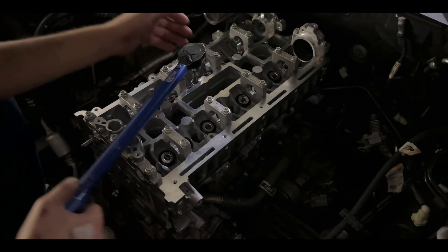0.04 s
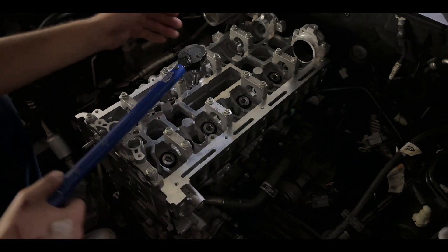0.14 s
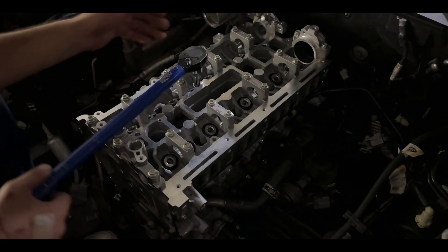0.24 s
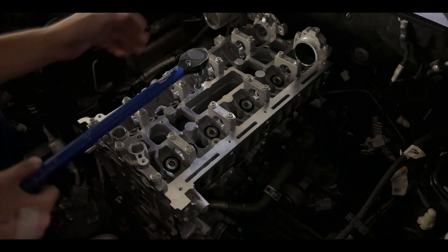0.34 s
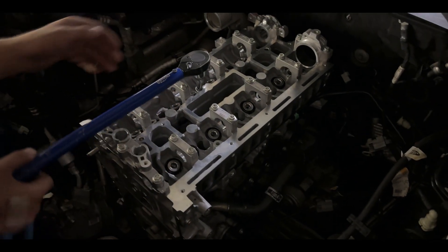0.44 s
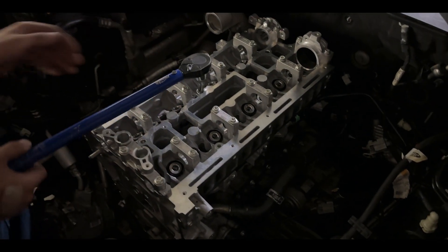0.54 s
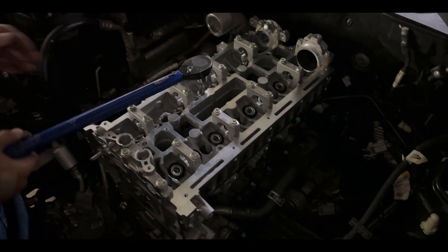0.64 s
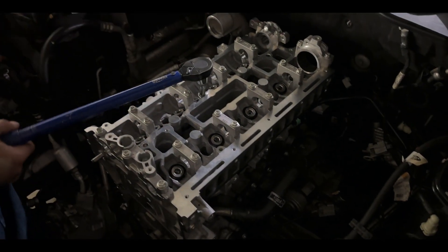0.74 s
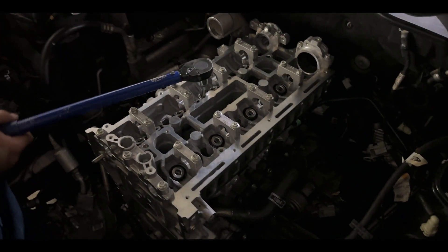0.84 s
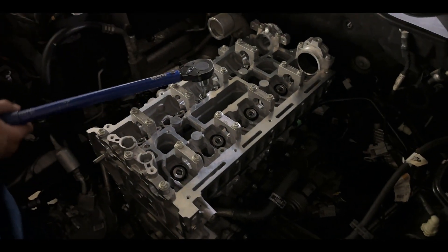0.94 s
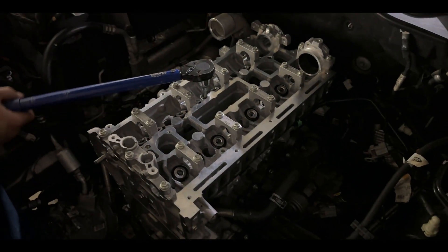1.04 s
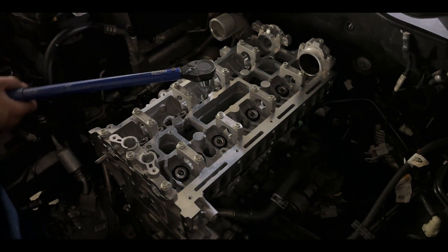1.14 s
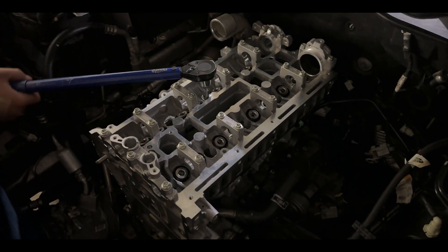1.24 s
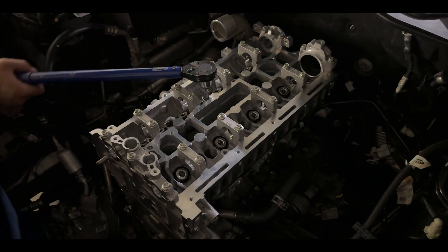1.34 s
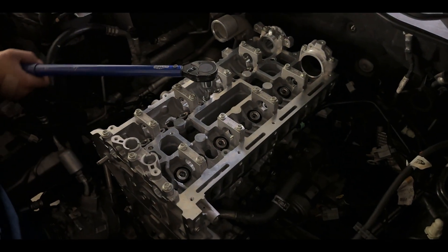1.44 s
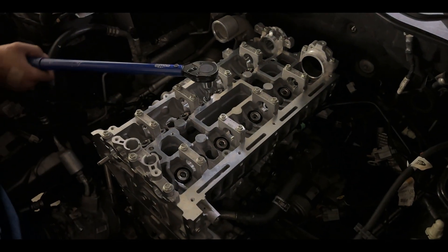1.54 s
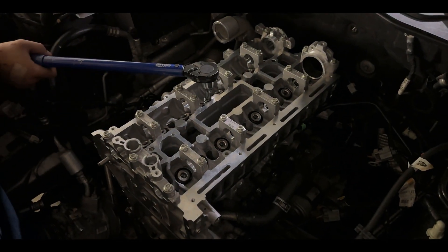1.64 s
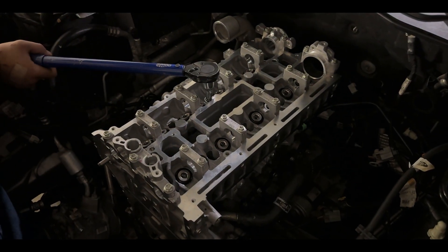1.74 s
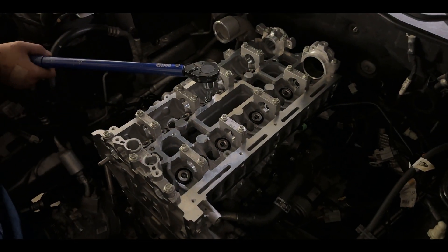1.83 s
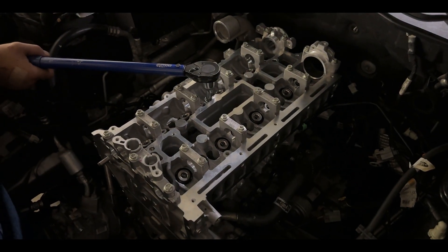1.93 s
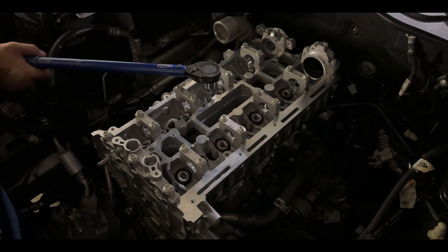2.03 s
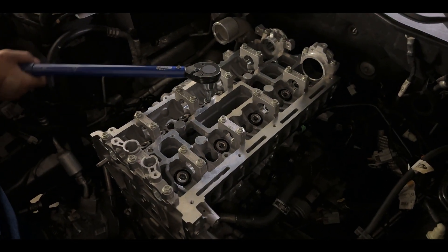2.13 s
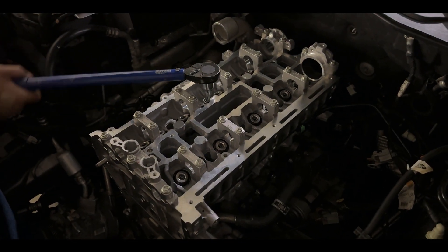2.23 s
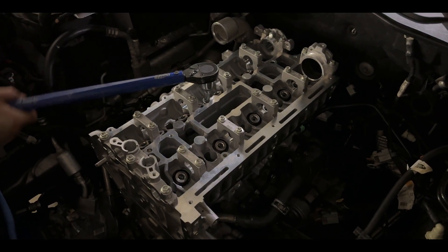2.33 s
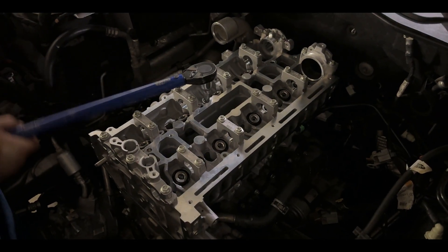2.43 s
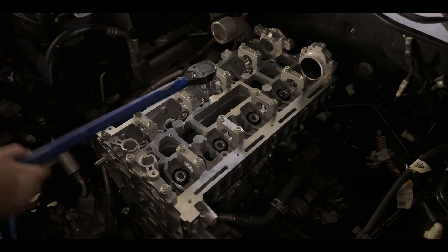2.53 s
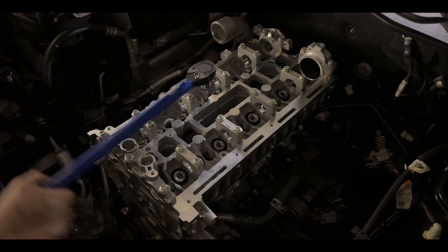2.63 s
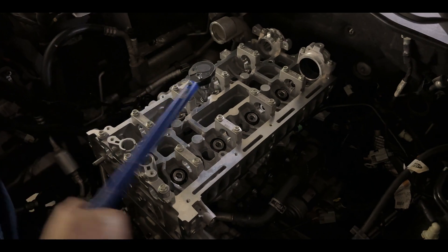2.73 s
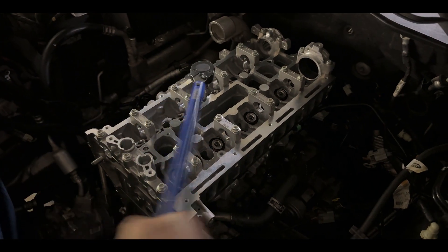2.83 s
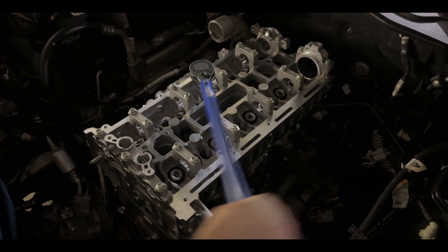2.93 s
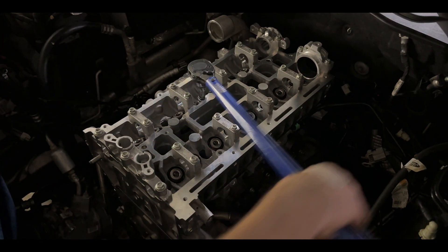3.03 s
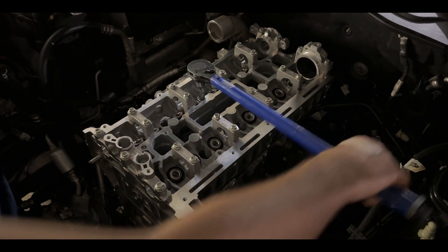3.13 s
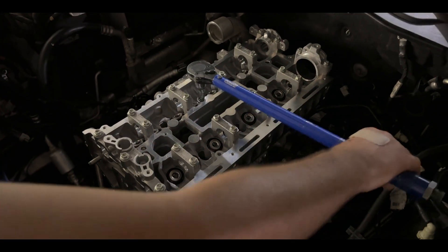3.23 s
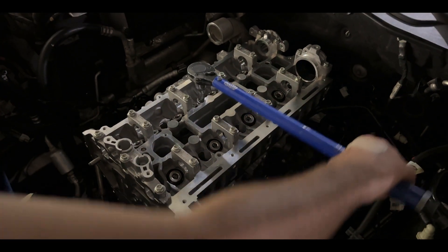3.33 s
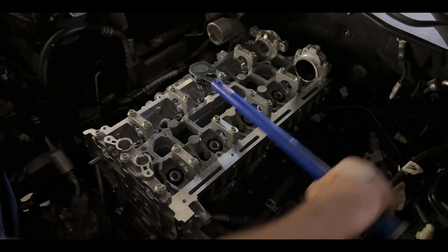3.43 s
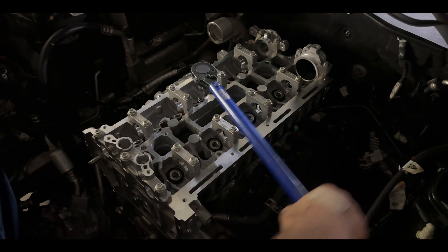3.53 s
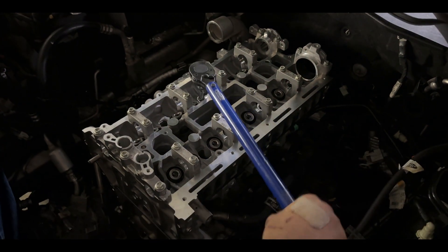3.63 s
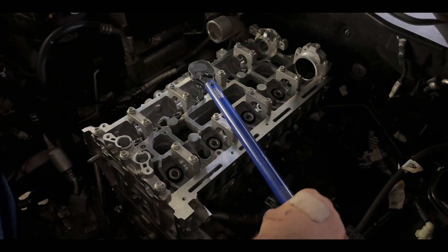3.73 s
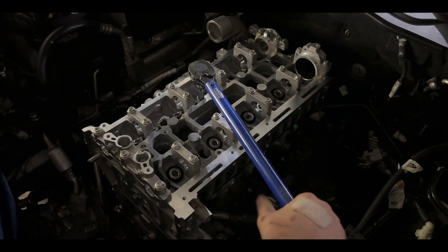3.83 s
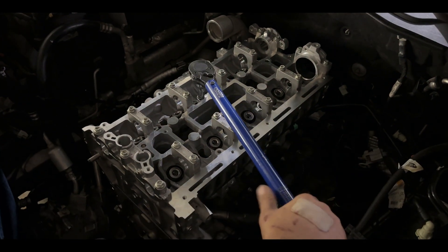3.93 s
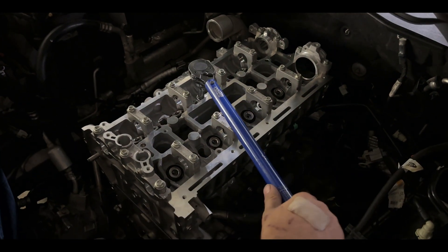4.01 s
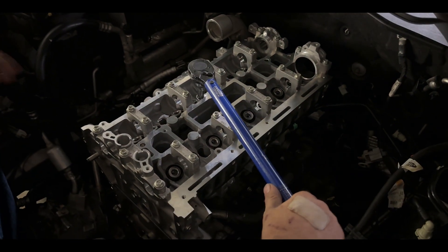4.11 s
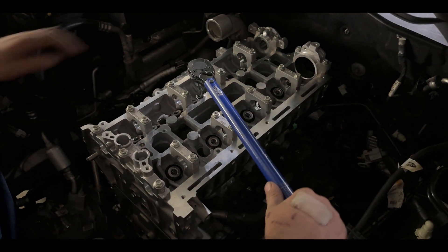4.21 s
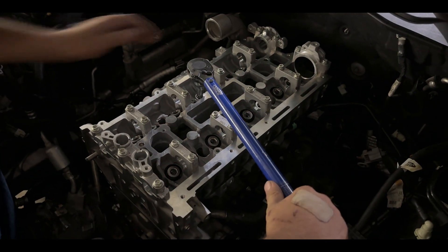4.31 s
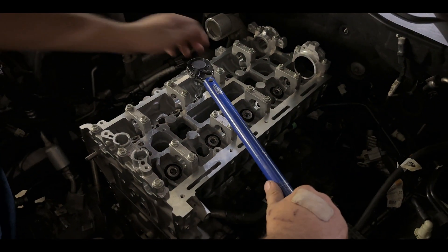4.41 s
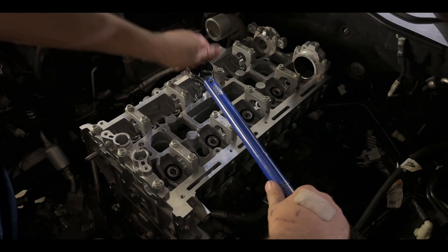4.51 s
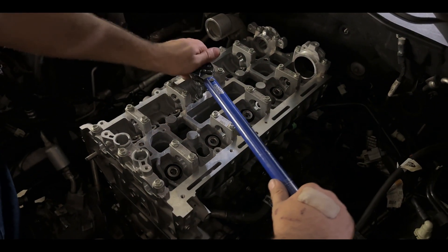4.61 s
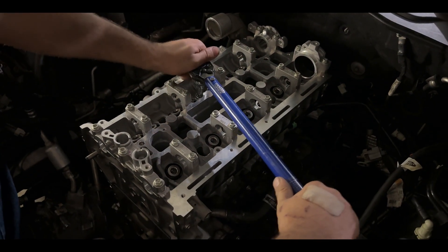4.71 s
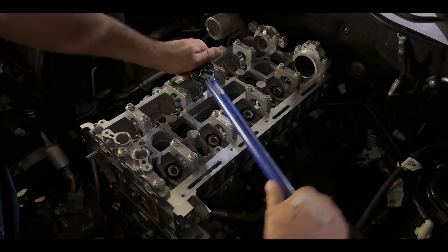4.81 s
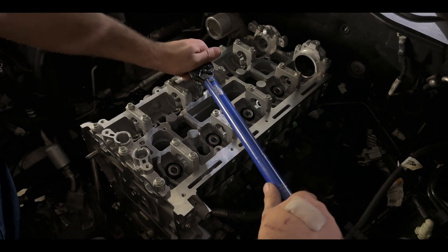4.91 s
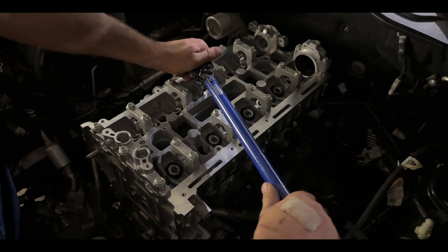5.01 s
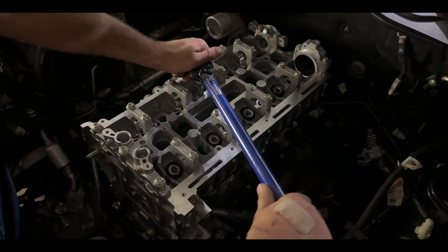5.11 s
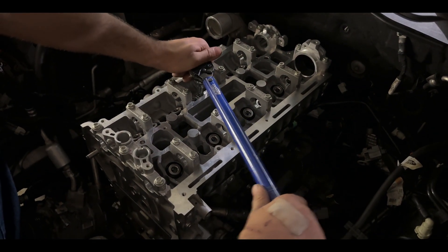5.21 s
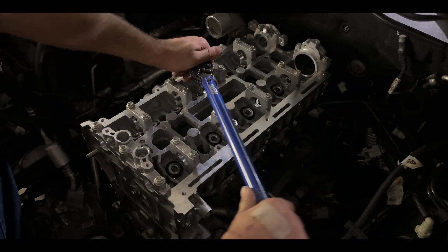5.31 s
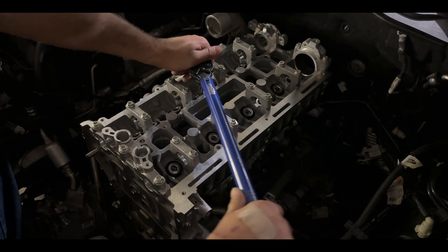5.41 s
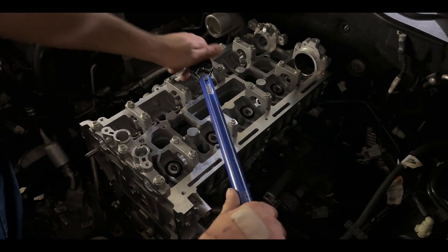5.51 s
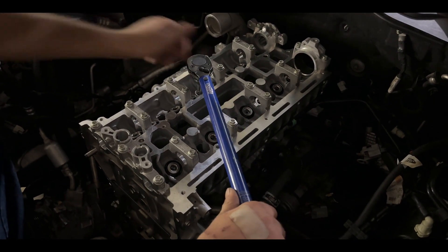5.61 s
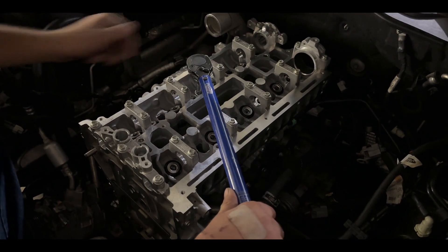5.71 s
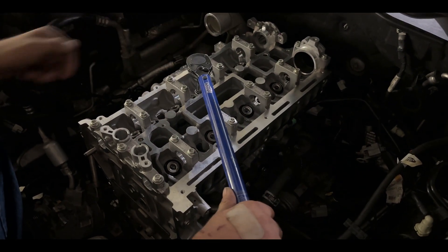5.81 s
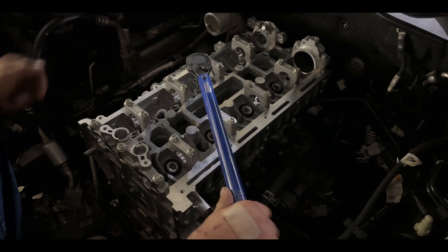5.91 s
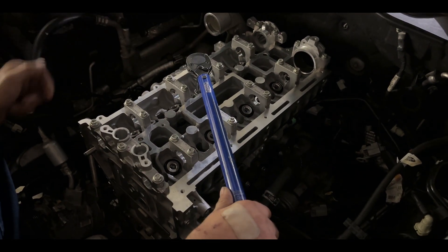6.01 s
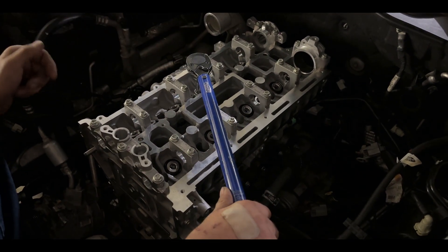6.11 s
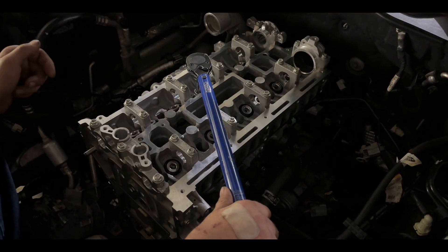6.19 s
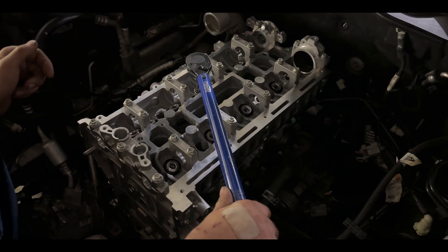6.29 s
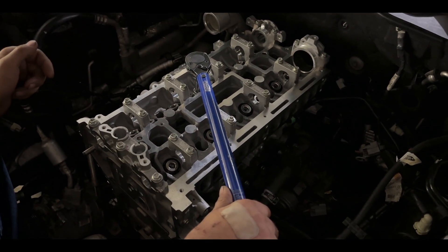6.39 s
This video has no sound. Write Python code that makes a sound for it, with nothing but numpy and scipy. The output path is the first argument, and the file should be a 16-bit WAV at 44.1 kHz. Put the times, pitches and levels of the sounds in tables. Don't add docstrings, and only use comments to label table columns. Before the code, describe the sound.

A torque wrench is eased over in a quiet workshop, its ratchet snaps eight bright metallic teeth, then one hard click as it releases.

```python
import sys
import numpy as np
from scipy import signal
from scipy.fft import rfft, irfft, next_fast_len
from scipy.io import wavfile
from scipy.ndimage import uniform_filter1d, map_coordinates

SR = 44100
rng = np.random.default_rng(int(sys.argv[2]) if len(sys.argv) > 2 else 0)


def wav_out(sig):
    wavfile.write(sys.argv[1], SR, np.round(np.clip(np.atleast_2d(sig).T, -1, 1) * 32767).astype(np.int16))


def decibels_to_gain(level_db):
    exponent = np.asarray(level_db, float) / 20
    return 10 ** exponent


N = 284471

# (time [s], peak [dB], casting share [dB], casting note [Hz], top band [dB])
RELEASE_BLOW = [
    (5.288, -15, -11.5, 1940, 1.1),
]
LEAD_IN_S = .008


def unit(x):
    return x / np.sqrt(np.mean(x ** 2) + 1e-20)


def along(points, hz):
    f, v = np.transpose(points)
    return np.interp(np.log(hz + 1), np.log(f + 1), v)


def curves(rows):
    s, *cols = np.transpose(rows)
    return [np.interp(np.arange(N) / SR, s, c) for c in cols]


def wander(count, every):
    return map_coordinates(rng.standard_normal(count // every + 4), [np.arange(count) / every])


def filtered(x, response):
    m = next_fast_len(x.shape[-1] + 4096)
    return irfft(rfft(x, m) * response(np.fft.rfftfreq(m, 1 / SR)), m)[..., :x.shape[-1]]


def peak(f, hz, width_hz):
    return 1j * f * width_hz / (hz * hz - f * f + 1j * f * width_hz)


def rush(spectrum, patchy_db):
    # (frequency [Hz], correlation)
    alike = [(60, 1), (130, 0.9), (290, 0.7), (640, 0.37), (1410, 0.026), (3100, 0.09), (6820, 0.61),
             (15000, 0.27)]
    z = signal.stft(rng.standard_normal((2, N)), nperseg=512)[2]
    field = uniform_filter1d(rng.standard_normal(z.shape[1:]), size=6, axis=0)
    field = uniform_filter1d(field, size=10, axis=1)
    pair = signal.istft(z * decibels_to_gain(patchy_db * unit(field)), nperseg=512)[1][:, :N]

    def mid_side(hz):
        angle = np.arccos(np.clip(along(alike, hz), -1, 1)) / 2
        return decibels_to_gain(along(spectrum, hz)) * [np.cos(angle), np.sin(angle)]

    mid, side = filtered(pair, mid_side)
    return unit(np.array([mid + side, mid - side]))


def strokes(rows):
    t = np.arange(N) / SR
    gain = 0
    for s, hold, db in rows:
        rise_db = 1800 * np.maximum(s - t, 0)
        fall_db = 221 * np.maximum(t - s - hold, 0)
        gain = gain + decibels_to_gain(db - rise_db - fall_db)
    return gain


def add(track, sound, s):
    part = track[:, round(s * SR):][:, :sound.shape[1]]
    part += sound[:, :part.shape[1]]


def answer(sound, colour, near_db, far_db):
    # (frequency [Hz], t60 [s])
    walls = [(300, 0.44), (1000, .4), (2500, .44), (5000, 0.43), (8000, 0.41), (11000, 0.28), (15000, 0.31)]
    # (frequency [Hz], level [dB])
    echo = [(500, 10), (1200, 5), (2500, 0), (5000, -0.7), (8600, -0.5), (12000, .5)]
    # (frequency [Hz], side level [dB])
    echo_side = [(600, -1.5), (1100, -2), (1800, -2)]
    hz, t, z = signal.stft(rng.standard_normal((2, SR * 2 // 5)), SR, nperseg=256)
    tail = signal.istft(z * decibels_to_gain(-60 * t / along(walls, hz)[:, None]), SR, nperseg=256)[1]
    u = np.arange(tail.shape[1]) / SR
    bay = rng.standard_normal(tail.shape) * decibels_to_gain(-60 * u / 0.035)
    both = decibels_to_gain(far_db) * tail / np.linalg.norm(tail[0]) + decibels_to_gain(near_db) * bay / np.linalg.norm(bay[0])
    both = both * (1 - np.exp(-u / 0.0029))
    wet = filtered(both, lambda f: colour(f) * decibels_to_gain(along(echo, f)))
    side = filtered(wet[0] - wet[1], lambda f: decibels_to_gain(along(echo_side, f)))
    wet = (wet.sum(axis=0) + np.array([side, -side])) / 2
    colour_power = np.mean(np.abs(colour(np.linspace(1, SR / 2, 2000))) ** 2)
    wet *= np.linalg.norm(sound) / np.sqrt(2 * colour_power)
    wet = np.pad(wet, ((0, 0), (np.argmax(np.abs(sound).max(axis=0)), 0)))
    wet[:, :sound.shape[1]] += sound
    return wet


def at_ports(common, left, right):
    # (frequency [Hz], phase [rad])
    lead = [(1000, 0), (1800, .45), (3300, 1.9), (5500, 3.4), (9000, 5.4), (12000, 6.28)]
    # (frequency [Hz], level [dB])
    lean = [(700, -2), (1800, -3), (3300, 0), (5500, 2.5), (9000, 0)]
    # (frequency [Hz], share [0-1])
    direct = [(1000, .95), (1800, .94), (3300, .7), (5500, .4), (9000, .7), (14000, .6)]
    sides = np.array([[.5], [-.5]])

    def share(hz):
        return np.clip(along(direct, hz), 0, 1)

    shared = filtered(common, lambda hz: np.sqrt(share(hz)) * np.exp(1j * sides * along(lead, hz)))
    own = filtered(np.array([left, right]), lambda hz: np.sqrt(1 - share(hz)))
    return filtered(shared + own, lambda hz: decibels_to_gain(sides * along(lean, hz)))


def rattle(t60, lead_db):
    t = np.arange(2600) / SR - LEAD_IN_S
    after, before = np.maximum(t, 0), np.minimum(t, 0)
    blow = decibels_to_gain(-60 * after / t60) + .7 * decibels_to_gain(-60 * after / 0.011)
    blow = blow * (1 - np.exp(-after / 0.00015))
    swell_in = decibels_to_gain(lead_db + 500 * before) + decibels_to_gain(-12 + 21000 * before)
    swell_in = swell_in * (t < 0) * (1 - np.exp(-(t + LEAD_IN_S) / .0015))
    lumps = decibels_to_gain(2.8 * wander(len(t), 30))
    force = rfft((blow + swell_in) * lumps * rng.standard_normal((3, len(t))))
    even = np.sqrt(uniform_filter1d(np.abs(force) ** 2, size=60, axis=1))
    return irfft(force / even, len(t))


def place(track, s, db, force, colour, broad, near_db, far_db):
    sound = at_ports(*filtered(force, colour))
    sound = sound * decibels_to_gain(db) / np.sqrt(np.mean(sound[:, 340:600] ** 2))
    add(track, answer(sound, broad, near_db, far_db), s - LEAD_IN_S)


def strikes(events, modes, crack, ring_db, near_db, far_db, handle_db, thud_db, lead_db, t60):
    track = np.zeros((2, N))
    for s, db, share_db, note_hz, top_db in events:
        strength = decibels_to_gain(ring_db + 2 * rng.standard_normal(len(modes)))
        handle = handle_db - 2.3 * (db - events[-1][1])
        body = share_db + 9.0
        seat = share_db + 11
        parts = [(900, thud_db + 1.25 * seat), (1300, -3.0), (1700, -3.1), (2000, body), (3600, body),
                 (4400, handle + 18), (6500, handle + 18.4), (7800, -1.2), (10500, 1.5), (11800, top_db)]

        def ring(f):
            total = decibels_to_gain(-3.0) * peak(f, note_hz, 220)
            for k, (hz, width_hz, level) in enumerate(modes):
                total = total + (-1) ** k * strength[k] * decibels_to_gain(level) * peak(f, hz, width_hz)
            return total

        def colour(f):
            return decibels_to_gain(along(parts, f)) * (ring(f) + decibels_to_gain(along(crack, f)))

        def broad(f):
            return decibels_to_gain(along(parts, f)) * (.2 * np.abs(ring(f)) + decibels_to_gain(along(crack, f)))

        place(track, s, db - 10, rattle(t60 + 0.01 * seat, lead_db), colour, broad, near_db, far_db)
    return track


def motor():
    # (frequency [Hz], moment of a crest [s])
    twice = [
        (117.92, 1.551),
        (117.24, 1.551),
    ]
    # (time [s], shaft line [dB], twice shaft [dB])
    swell = [(0, -66, -68), (.8, -69.5, -66), (2.4, -59, -66.5), (3.4, -60.5, -64), (4.2, -60.5, -72),
             (5.3, -70.5, -76), (6.45, -66.5, -74)]
    # (frequency [Hz], density [dB per Hz])
    drone = [(13, -41.5), (22, -17.5), (54, -1.5), (112, -0.5), (140, -8), (177, -13), (238, -12.5),
             (305, -24), (420, -26), (550, -57.5), (920, -120)]
    t = np.arange(N) / SR + .00022 * np.array([[.5], [-.5]])

    def line(hz, crest_s):
        return np.sqrt(2) * np.cos(2 * np.pi * hz * (t - crest_s))

    shaft_db, twice_db = curves(swell)
    mains = decibels_to_gain(-62) * line(119.97, 3.00283)
    fan = decibels_to_gain(-69) * line(55.29, 3.0105)
    shaft = decibels_to_gain(shaft_db) * line(58.89, 3.0049)
    rotors = decibels_to_gain(twice_db) * (line(*twice[0]) + decibels_to_gain(-2) * line(*twice[1]))
    return mains + fan + shaft + rotors + decibels_to_gain(-59.5) * rush(drone, patchy_db=2.46)


def rustle():
    # (start [s], hold [s], sleeve [dB], shoe [dB])
    moves = [(0, 0.013, -81, -72.5), (0.077, .12, -88, -74.5), (.24, 0.089, -84, -81.5),
             (.35, 0.062, -77.5, -80.5), (0.427, .16, -66, -71.5), (0.606, 0.073, -74.5, -71),
             (.72, 0.18, -76, -77.5), (0.901, 0.074, -74, -73), (1.003, 0.098, -78, -68),
             (1.183, 0.02, -80, -77), (1.26, 0.051, -84.5, -94), (1.416, 0.035, -86.5, -77),
             (1.49, .04, -93, -72), (1.631, 0.14, -88.5, -81), (1.853, 0.082, -90, -82.5),
             (2.12, 0.065, -86, -71.5), (2.268, 0.045, -81.5, -82.5), (2.387, 0.022, -77.5, -95.5),
             (4.124, 0.019, -69.5, -74), (4.575, 0.084, -92, -88), (4.78, 0.04, -87.5, -73.5),
             (5.573, 0.037, -82, -88), (5.712, 0.03, -93, -99), (5.966, 0.15, -83.5, -75.5),
             (6.442, 0.017, -78, -70.5)]
    # (frequency [Hz], density [dB per Hz])
    sleeve = [(710, -22), (1200, -2), (1810, -9), (2480, -0.5), (4410, -9.5), (5970, -9), (8170, -9.5),
              (10300, -20.5), (11200, -26.5), (13000, -21), (16000, -30.5)]
    # (frequency [Hz], density [dB per Hz])
    shoe = [(150, -30), (250, -6), (302, -5.5), (631, -4), (801, -12), (1800, -18.5), (2340, -43.5),
            (3960, -120)]
    cloth = decibels_to_gain(-92) + strokes([row[:3] for row in moves])
    scuff = decibels_to_gain(-84) + strokes([row[:2] + row[3:] for row in moves])
    grain = decibels_to_gain(0.92 * wander(N, 200))
    return cloth * rush(sleeve, patchy_db=-0.7) + scuff * grain * rush(shoe, patchy_db=2.5)


def sleeve_ring():
    # (start [s], hold [s], level [dB])
    brushes = [
        (.428, 0.15, -69.5),
        (1.02, 0.05, -82),
        (5.96, 0.17, -84),
    ]
    ringing = unit(filtered(rng.standard_normal((2, N)), lambda f: peak(f, 2490, 330) ** 2))
    slips = decibels_to_gain(2.5 * wander(N, 300))
    return strokes(brushes) * decibels_to_gain(-2.0) * slips * ringing


def knocks():
    # (time [s], peak [dB], pitch [Hz], t60 [s])
    dull = [(0.028, -64, 446, 0.18), (0.112, -54.5, 447, 0.04), (0.856, -76, 540, 0.053),
            (0.927, -56, 470, 0.037), (1.015, -63, 583, 0.036), (1.093, -55.5, 530, 0.068),
            (1.161, -50.5, 470, 0.032), (1.341, -78, 362, 0.04), (2.494, -49, 472, 0.044),
            (4.126, -58, 534.5, 0.067), (4.785, -56, 760, .05), (5.289, -48.5, 616, 0.11),
            (6.088, -63, 506, 0.057), (6.204, -62.5, 463, 0.041)]
    # (time [s], peak [dB], pitch [Hz], t60 [s])
    thuds = [
        (.004, -69, 4950, 0.036),
        (1.52, -67, 174, 0.17),
        (5.289, -50.5, 148, 0.21),
        (5.289, -52.5, 303, 0.089),
             (1.512, -51.5, 258, .17),
    ]
    track, t = np.zeros((2, N)), np.arange(SR // 6) / SR
    for s, db, hz, t60 in dull + thuds:
        fade = decibels_to_gain(-60 * t / t60) * (1 - np.exp(-t / 0.00093))

        def colour(f):
            return peak(f, hz, 330) ** 2

        puff = filtered(rng.standard_normal((2, len(t))), colour)
        sound = decibels_to_gain(db) * fade * (np.sin(2 * np.pi * hz * t) + 0.26 * unit(puff))
        add(track, answer(sound, colour, near_db=-20.0, far_db=-13.5), s)
    return track


def play():
    # (time [s], peak [dB], pitch [Hz], steel edge
    # [dB])
    ticks = [(1.1897, -68, 2560, -28), (1.3994, -65, 2440, -18), (2.048, -64, 2500, -21),
             (2.067, -54.5, 2600, -29), (2.1039, -46.5, 2710, -10.5), (2.145, -51.5, 2260, -26),
             (2.1538, -54.5, 2030, -23), (2.198, -61, 2620, -30), (2.403, -61, 2490, -25),
             (3.3724, -61.5, 2390, -33), (3.489, -62, 2340, -29.5), (3.504, -62, 2630, -2.5),
             (3.5513, -54.5, 1916, -6.5), (3.5654, -66, 2260, -12), (3.5997, -64, 2350, -22),
             (4.5994, -69, 2610, -9.5), (4.8644, -71.5, 2740, -21), (6.042, -57.5, 2400, -16.5)]
    # (time [s], peak [dB], pitch [Hz], steel edge [dB])
    taps = [(1.19, -59, 1310, -28), (1.399, -68, 1180, -27), (1.697, -59, 1150, -36),
            (1.94, -62.5, 1510, -22), (2.103, -48.5, 988, -20), (3.615, -60, 990, -42),
            (3.628, -51, 940, -36), (3.638, -47.5, 1400, -15.5), (4.784, -55, 1700, -40)]
    track = np.zeros((2, N))
    for events, t60 in (ticks, 0.045), (taps, .048):
        for s, db, hz, edge_db in events:
            edge = decibels_to_gain(edge_db + 4.5)

            def colour(f):
                bright = peak(f, 7400, 4000) ** 3 - peak(f, 4100, 2400) ** 2
                return peak(f, hz, 1200) ** 2 + edge * bright

            place(track, s, db - 10.5, rattle(t60, lead_db=-38.0), colour, colour, near_db=-5.5, far_db=-9)
    return track


def bar():
    # (frequency [Hz], level [dB], t60 [s])
    handle_modes = [(975, -38.5, 0.25), (1994, -33.5, .25), (2630, -22, 0.15), (4630, -37, 0.47),
                    (6700, -32.5, 0.31), (7750, -32.5, 0.36), (13000, -41, 0.08)]
    track, t = np.zeros((2, N)), np.arange(SR // 2) / SR
    s, db = RELEASE_BLOW[0][:2]
    for hz, level, t60 in handle_modes:
        waver = np.cumsum(.115 * rng.standard_normal((2, len(t))), axis=1)
        add(track, decibels_to_gain(db + level - 60 * t / t60) * np.sin(2 * np.pi * hz * t + waver), s + .002)
    return track


def ratchet():
    # (time [s], peak [dB], casting share [dB], casting note [Hz], top band [dB])
    teeth = [(2.4277, -12.5, -10, 2600, 2), (2.5589, -14.5, -12.5, 2040, -3.5),
             (2.6771, -14, -12, 3730, -4.5), (2.7777, -13.5, -11, 2490, -2.5),
             (2.8674, -16.5, -7, 3500, 2.5), (2.9553, -16.5, -8, 2070, 2.2), (3.043, -14.5, -11, 3380, -1),
             (3.1481, -15.5, -7.5, 3070, -0.2)]
    # (time [s], peak [dB], casting share [dB], casting note [Hz], top band [dB])
    bounce = [
        (2.4354, -28.5, -10.5, 3238, 1.5),
    ]
    # (frequency [Hz], width [Hz], level [dB])
    pawl = [(1471.6, 54, -12), (2070, 53, -9.5), (2400, 50, -14.5), (2747, 40, -8), (3380, 40, 3.5),
            (6110, 100, -14.5), (8560, 300, 5), (9580, 60, -7.5), (13300, 360, -7.5), (14670, 400, -3)]
    # (frequency [Hz], density [dB per Hz])
    snap = [(180, -49.5), (300, -25.5), (1060, -16.5), (1460, -13.5), (1620, -13.5), (2010, -4), (7120, -5),
            (8560, -5), (11200, -7), (15900, -9), (16900, -20.5)]
    snaps = strikes(teeth, pawl, snap, ring_db=0.0, near_db=-1.5, far_db=-13.5,
                    handle_db=-17, thud_db=-5.5, lead_db=-22.5, t60=0.032)
    landing = strikes(bounce, pawl, snap, ring_db=2.0, near_db=-1.0, far_db=-13.5,
                      handle_db=-24.5, thud_db=-8.5, lead_db=-24, t60=.012)
    return snaps + landing


def release():
    # (frequency [Hz], width [Hz], level [dB])
    latch = [(1970, 91, 9), (2630, 100, -4), (4734, 150, -6.5), (6252, 150, -4.5), (7500, 770, -3),
             (9680, 550, -6), (12140, 280, -5.5), (13460, 200, -2)]
    # (frequency [Hz], density [dB per Hz])
    crack = [(180, -39.5), (300, -23), (1100, -17.5), (2630, 6.5), (4220, -7.5), (4520, -17.5), (8140, -8),
             (11000, -8.5), (13300, -10), (15900, -11.5), (16900, -26)]
    return strikes(RELEASE_BLOW, latch, crack, ring_db=6.0, near_db=-2.5, far_db=-15,
                   handle_db=-13.0, thud_db=1.4, lead_db=-24.5, t60=0.027)


def scene():
    background = motor() + rustle() + sleeve_ring()
    loose_parts = knocks() + play()
    return background + loose_parts + bar() + ratchet() + release()


def band_limit(x):
    return signal.sosfilt(signal.butter(12, 16990, fs=SR, output="sos"), x)


def record(dry):
    # (frequency [Hz], gain [dB])
    microphone = [(20, -24), (30, -7), (45, 0), (15950, 0), (16250, -11), (16900, -19), (17050, -60)]
    # (frequency [Hz], density [dB per Hz])
    hiss = [(150, -32.5), (250, -4), (309, -16), (401, -19.5), (430, -7), (504, -12.5), (1250, -25.5),
            (1420, -21), (1940, -29.5), (3010, -27), (3230, -29), (14600, -42), (16500, -51)]
    mid, side = (dry[0] + dry[1]) / 2, (dry[0] - dry[1]) / 2
    side = filtered(side, lambda hz: decibels_to_gain(along([(7000, 0), (9000, -1.5), (12000, -3)], hz)))

    def response(hz):
        notch = (1 - .6 * peak(hz, 11280, 800)) ** 2
        return decibels_to_gain(along(microphone, hz)) * notch

    coloured = filtered(np.array([mid + side, mid - side]), response)
    mix = coloured + decibels_to_gain(-77) * rush(hiss, patchy_db=0.53)
    return band_limit(mix)


dry = scene()
out = record(dry)
wav_out(out)
```